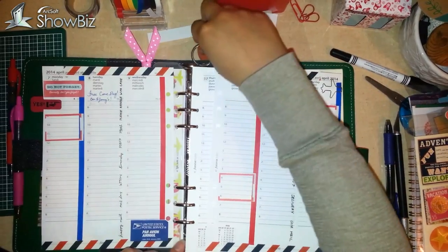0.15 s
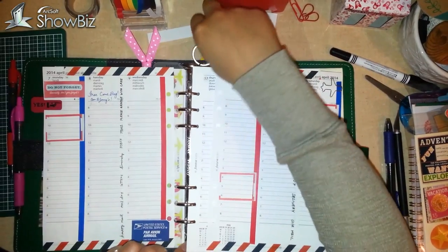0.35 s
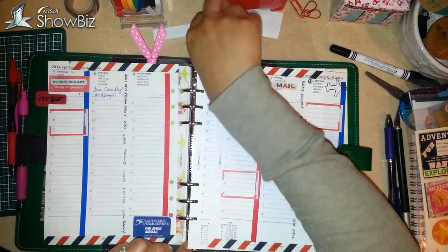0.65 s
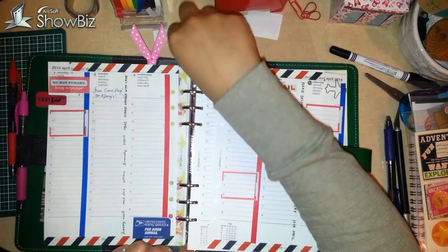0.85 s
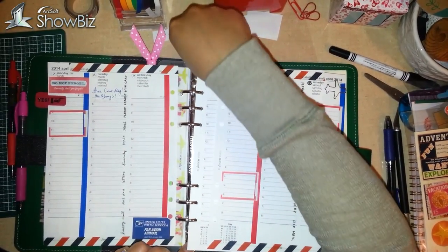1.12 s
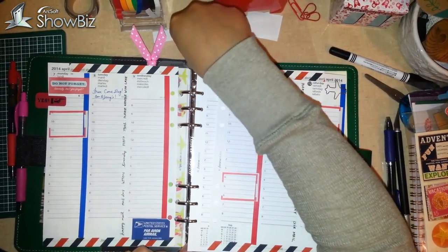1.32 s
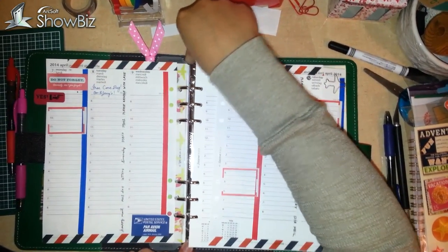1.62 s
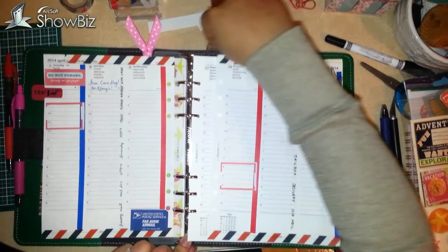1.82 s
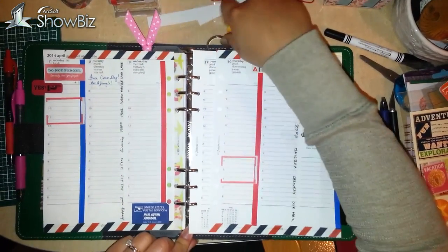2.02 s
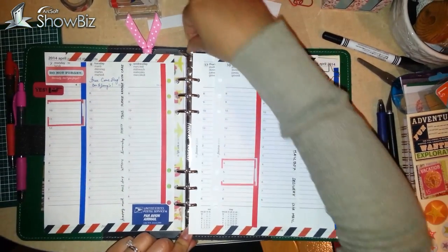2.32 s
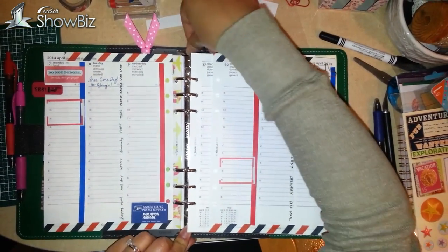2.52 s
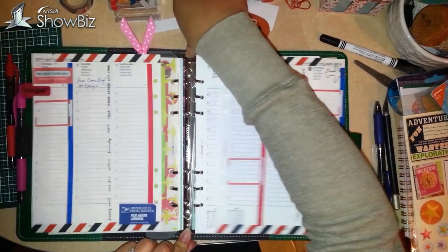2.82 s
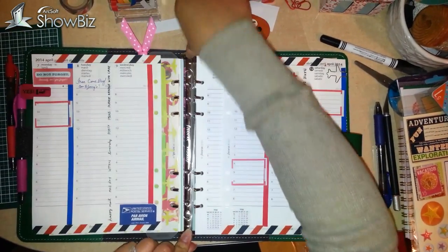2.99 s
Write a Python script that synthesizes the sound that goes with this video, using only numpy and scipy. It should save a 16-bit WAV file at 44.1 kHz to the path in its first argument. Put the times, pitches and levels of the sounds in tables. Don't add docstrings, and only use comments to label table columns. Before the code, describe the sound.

Close above a desk in a small room, binder rings click and knock in a quick flurry, quieten to faint paper sliding and tiny ticks, then close with a hard crack and brief shudder over faint background hum.

```python
import sys
import numpy as np
from scipy import signal
from scipy.fft import rfft, irfft, next_fast_len
from scipy.io import wavfile
from scipy.ndimage import uniform_filter1d, map_coordinates

SR = 44100
rng = np.random.default_rng(int(sys.argv[2]) if len(sys.argv) > 2 else 0)


def unload_audio(sound):
    columns = np.transpose(np.atleast_2d(sound))
    steps = np.round(np.clip(columns, -1, 1) * 32767)
    wavfile.write(sys.argv[1], SR, steps.astype(np.int16))


def linear_from_db(decibels):
    return 10 ** (np.asarray(decibels, float) / 20)


N = 138915


def unit(x):
    return x / np.sqrt(np.mean(x ** 2))


def high(x, hz):
    return signal.sosfilt(signal.butter(4, hz, "high", fs=SR, output="sos"), x)


def dull(x):
    return signal.sosfilt(signal.ellip(6, 1, 40, 14300, fs=SR, output="sos"), x)


def colour(x, points):
    length = x.shape[-1]
    size = next_fast_len(length)
    hz = np.fft.rfftfreq(size, 1 / SR) + 1
    point_hz, point_db = np.array(points).T
    gain = linear_from_db(np.interp(np.log(hz), np.log(point_hz), point_db))
    return irfft(rfft(x, size) * gain, size)[..., :length]


def burst(ms, noise):
    t = np.arange(len(noise)) / (max(ms, .1) * SR / 1000)
    return noise * np.exp(-t) * (1 - np.exp(-6 * t))


def pair(length):
    mid, side = rng.standard_normal((2, length))
    side = signal.lfilter(*signal.butter(2, 450, "high", fs=SR), side)
    return np.array([mid + side, mid - side])


def add(track, s, x, pan_db):
    i = max(int(s * SR), 0)
    x = x[..., :N - i]
    track[:, i:i + x.shape[-1]] += linear_from_db(np.array([[pan_db], [-pan_db]]) / 2) * x


MODE_JITTER, MODE_SCATTER_DB = .008, 2
SPREAD_DB, SPREAD_HZ = 5, 1900
TICK_FALL_DB_PER_OCT = 17.5


def ring(x, modes, near_hz=0):
    out = 0
    x = np.pad(x, ((0, SR // 4)))
    scatter = rng.standard_normal((len(modes), 3))
    for (hz, db, t60), (detune, louder, lean) in zip(modes, scatter):
        turn = 2j * np.pi * hz * (1 + MODE_JITTER * detune) / SR
        pole = np.exp(turn - np.log(1000) / (max(t60, .002) * SR))
        db = db + MODE_SCATTER_DB * louder
        if near_hz:
            db = db - TICK_FALL_DB_PER_OCT * abs(np.log2(hz / near_hz))
        lean_db = lean * SPREAD_DB * min(hz / SPREAD_HZ, 1) * np.array([[1], [-1]]) / 2
        out = out + linear_from_db(db + lean_db) * signal.lfilter([1], [1, -pole], x).imag
    return out


def fading(bands, width):
    t = np.arange(SR // 2 + SR // 4) / SR
    tail = 0
    for hz, db, t60 in bands:
        band_pass = signal.butter(1, [hz / width, hz * width], "band", fs=SR, output="sos")
        band = signal.sosfilt(band_pass, pair(len(t)))
        tail = tail + linear_from_db(db - 60 * t / t60) * unit(band)
    gap_s = 0.0042
    return tail * np.clip(t / gap_s - 1, 0, 1)


# start_s [s], level_db [dB], contact_ms [ms]
KNOCKS = [(.002, -30, 2.35), (0.101, -38.5, 1.74), (0.214, -41, 0.45), (0.535, -38.5, 1.4),
          (.590, -20.5, 1.03), (.594, -21, 0.93), (0.601, -20.5, 1.6), (0.62, -30, 1.4), (0.648, -44, 0.19),
          (0.7235, -28, 0.86), (.730, -18, 1.9), (.738, -26.5, 0.57), (.740, -15.5, 0.56),
          (0.772, -34, 0.62), (0.789, -31, 0.96), (.833, -29, 0.66), (1.134, -39, 1.54), (1.150, -42, 0.96),
          (1.705, -46, 1.4), (1.839, -42.5, 1.75), (2.01, -51.5, 0.44), (2.047, -35.5, 3.3),
          (2.055, -40.5, 5.3), (2.156, -53, 0.56), (2.477, -45, 0.35), (2.484, -33, 1.16),
          (2.826, -19.5, 0.61), (2.829, -9.5, 1.4), (3.053, -46, 0.57), (3.094, -40, 0.43)]
# pitch_hz [Hz], level_db [dB], t60_s [s]
DESK_MODES = [(151.6, -16, 0.59), (194, -5, 0.042), (276.6, -4, 0.08), (342, -0.5, 0.063),
              (455, -0.5, 0.059), (518, -4.5, 0.041), (601, -3.5, 0.049), (743.6, 0.5, 0.036),
              (887, -3, 0.032), (1123, 4.5, 0.023), (1378, -9.5, 0.075), (1500, -5, 0.071),
              (1800, -9, 0.089)]


def desk():
    x = np.zeros((2, N))
    t_ms = np.arange(400) / SR * 1000
    for s, db, ms in KNOCKS:
        push = np.sin(np.pi * np.clip(t_ms / max(ms, .1), 0, 1)) ** 2
        add(x, s, ring(linear_from_db(db) * push / push.sum(), DESK_MODES), 2)
    return high(x, 199.0) / 2


# start_s [s], level_db [dB], pitch_hz [Hz], t60_s [s]
THRUMS = [(.004, -44.5, 898, 0.092), (.008, -40, 269.8, 0.28), (.219, -42.5, 759, 0.11),
          (.597, -20, 289, 0.07), (.592, -29, 810, 0.09), (.618, -27, 282, 0.065),
          (0.737, -22.5, 282, 0.088), (.738, -30, 1120, .04), (.622, -23, 455, 0.076),
          (.650, -36, 645, 0.089), (0.654, -31, 459, 0.11), (0.758, -24.5, 277, 0.073),
          (.760, -44, 895, 0.13), (.774, -27.5, 276.7, 0.18), (0.789, -30.5, 459, 0.13),
          (.800, -46, 154.4, .3), (.838, -31, 455, 0.14), (2.828, -11, 304, 0.031), (2.825, -28, 1075, .03),
          (2.848, -23, 450, .12), (2.888, -35.5, 450, 0.14)]


def desk_thrum():
    x = np.zeros((2, N))
    t = np.arange(SR // 3) / SR
    k = SR // 100
    swell = 1 - np.exp(-t / 0.0057)
    for (s, db, hz, t60), noise in zip(THRUMS, rng.standard_normal((len(THRUMS), len(t)))):
        flutter_db = 2 * unit(uniform_filter1d(uniform_filter1d(noise, k), k))
        level = linear_from_db(db + flutter_db - 60 * t / t60)
        add(x, s, level * swell * np.sin(2 * np.pi * hz * t), 1.5)
    return x


# start_s [s], level_db [dB], length_ms [ms], strongest_hz [Hz]
TICKS = [(0.037, -43, 5.5, 2400), (0.1, -39.5, 9.4, 2000), (0.120, -31.5, 5, 1620), (.129, -39, 3, 2880),
         (.197, -45, 3, 4400), (.489, -46.5, 6, 2270), (0.215, -38, 4.7, 1800), (.498, -39, 13, 2250),
         (0.528, -36, 17, 2750), (0.588, -27.5, 27, 1570), (0.605, -34.5, 24, 2830),
         (0.725, -35.5, 11, 2180), (0.752, -26, 5.7, 2620), (.787, -26.5, 3.1, 2640),
         (0.795, -28, 5.5, 2670), (0.8173, -23, 2.1, 2700), (.832, -20, 4, 3150), (.856, -26.5, 4.2, 2460),
         (0.872, -35, 11, 2700), (.882, -41, 5, 2500), (0.919, -40, 2.4, 2400), (.8435, -15.5, 9.3, 3070),
         (.900, -34.5, 1.9, 2350), (1.128, -45.5, 30, 2300), (1.881, -46, 3.8, 2400),
         (1.458, -45, 5.2, 2460), (1.704, -48, 5.5, 3070), (1.791, -46.5, 8.9, 2900),
         (1.805, -48, 7.8, 2400), (1.821, -39.5, 1.2, 2530), (1.838, -42, 1.7, 2400),
         (1.858, -34, 3.4, 3200), (1.866, -37, 2.6, 2620), (1.889, -45, 3, 2300), (1.902, -45, 2.7, 2600),
         (1.914, -46, 2.2, 3420), (1.925, -57, 2, 2470), (1.935, -61, 1.8, 2500), (1.971, -48, 3.4, 3500),
         (2.024, -53, 3, 1700), (2.838, -18, 6, 2280), (2.9085, -34, 3.6, 1920), (1.845, -34, 1.7, 2820),
         (1.8504, -35, 3.9, 2900), (1.958, -40.5, 8, 1850), (2.01, -36.5, 5, 1730), (2.101, -49, 4, 2100),
         (2.158, -49.5, 6.2, 2180), (3.079, -48, 2.2, 2570), (3.092, -40.5, 8.3, 3000),
         (3.11, -39.5, 4.3, 3400)]
# pitch_hz [Hz], level_db [dB], t60_s [s]
METAL_MODES = [(1140, 6, 0.0057), (1670, -9, 0.025), (2244, 0.5, 0.017), (2550, -0.5, 0.008),
               (2920, -9, 0.0066), (4060, 0.5, 0.013), (4610, -8.5, 0.024), (5070, -43, 0.0027),
               (8000, 1.5, 0.015), (9900, -17, 0.0016)]


def metal():
    x = np.zeros((2, N))
    for (s, db, ms, hz), noise in zip(TICKS, rng.standard_normal((len(TICKS), 2000))):
        rattle = linear_from_db(db) * burst(ms / 2, noise) / np.sqrt(ms * 10)
        add(x, s, ring(rattle, METAL_MODES, hz), 5.5)
    return high(x, 1180)


# start_s [s], level_db [dB], decay_ms [ms], pan_db [dB]
CRACKS = [(.738, -37.5, 1.85, -30), (0.787, -29, 1.9, 4), (0.7924, -30.5, 4.3, -4), (0.8166, -32, 3.2, -9),
          (0.898, -45, 3.2, -8), (1.843, -37, 5.3, 1), (2.011, -46.5, 3.1, 4), (2.156, -48, 4.3, -3),
          (2.483, -40, 4.9, -1), (2.82, -27.5, 3.1, 0), (2.825, -14, 4.56, -2)]
# pitch_hz [Hz], level_db [dB per Hz]
CRACK_COLOUR = [(350, -10.5), (600, 6), (1830, -1.5), (2900, -2), (4770, -8), (7060, -17), (10400, -14),
                (15000, -25)]
# pitch_hz [Hz], level_db [dB], t60_s [s]
RING_MODES = [(800, -21, 0.011), (1360, 14, 0.0077), (2320, -9, 0.02), (2900, -3.5, 0.02),
              (4170, 0.5, 0.021)]
# pitch_hz [Hz], level_db [dB], t60_s [s]
SHUDDER = [(264, -30, 0.15), (448, -21.5, 0.15), (840, -33.5, 0.35), (1380, -40.5, 0.44), (2400, -31, 0.13),
           (3900, -37.5, 0.32), (7500, -59, 0.22), (12000, -49, 0.36)]
SNAP_S, SNAP_DB = 2.8255, -21


def snap():
    x = np.zeros((2, N))
    for (s, db, ms, pan), (mid, side) in zip(CRACKS, rng.standard_normal((len(CRACKS), 2, 1500))):
        ports = [unit(colour(mid + k * .5 * side, CRACK_COLOUR)) for k in (1, -1)]
        add(x, s, linear_from_db(db) * np.array([burst(ms, noise) for noise in ports]), pan)
    blow = linear_from_db(SNAP_DB) * burst(2.3, rng.standard_normal(800)) / 10
    add(x, SNAP_S, high(ring(blow, RING_MODES), 440), 1.5)
    add(x, SNAP_S, dull(high(fading(SHUDDER, 1.106), 210)), 1)
    return x


# start_s [s], length_s [s], level_db [dB], pan_db [dB]
SCRAPES = [
    (0, 0.23, -64, -16),
    (0.74, 0.038, -47, -2),
    (0.779, 0.045, -42.5, 1),
    (0.819, 0.11, -42, -1),
    (1.459, 0.079, -54, -0.5),
    (1.792, .19, -52.5, -1.5),
    (2.786, 0.03, -59, 2),
    (3.077, 0.074, -50, -2),
]
# pitch_hz [Hz], level_db [dB per Hz]
PAPER_COLOUR = [(800, 1), (1600, -6), (2300, -5.5), (3300, -6), (4500, -7), (5900, -15.5), (8500, -14.5),
                (14500, -17)]
# start_s [s], level_db [dB]
SHUFFLE = [(0, -48.5), (.25, -65), (0.399, -61.5), (1, -59), (1.6, -69), (1.95, -58), (2.2, -63.5),
           (2.35, -91), (2.5, -60), (2.7, -72), (3.15, -59)]
GRAINS_PER_S, GRAIN_SCATTER_DB = 6600, 2
SCRAPE_ATTACK = 0.17


def paper():
    chance, size = rng.random(N), rng.exponential(size=N)
    grain_level = (chance < GRAINS_PER_S / SR) * linear_from_db(GRAIN_SCATTER_DB * np.minimum(size, 3.5))
    grains = grain_level * (pair(N) + rng.standard_normal(N))
    grains = unit(colour(grains, PAPER_COLOUR))
    x = grains[:, ::-1] * linear_from_db(np.interp(np.arange(N) / SR, *np.array(SHUFFLE).T))
    for s, length, db, pan in SCRAPES:
        i = max(int(s * SR), 0)
        t = np.arange(int(length * SR)) / (length * SR)
        g = grains[:, i:i + len(t)]
        shape = np.minimum(t / SCRAPE_ATTACK, (1 - t) / (1 - SCRAPE_ATTACK))[:g.shape[1]]
        add(x, s, linear_from_db(db) * g * shape ** 0.35, pan)
    return x


# pitch_hz [Hz], level_db [dB], t60_s [s]
ROOM_BANDS = [(123.5, -4.5, 0.38), (257, -44, 0.067), (500, -9, 0.28), (926, -3, 0.32), (2000, -2.5, 0.35),
              (4130, -8.5, 0.15), (8640, -4, 0.64), (13000, -20, .2)]


def room(x):
    tail = fading(ROOM_BANDS, np.sqrt(2)) / 150
    return signal.fftconvolve(x.mean(0, keepdims=True), tail, axes=1)[:, :N]


# pitch_hz [Hz], level_db [dB per Hz]
HUM_COLOUR = [(15, -59), (25, -18), (87, -2.5), (198, -5.5), (267, -9.5), (413, -15), (810, -22),
              (900, -30), (1170, -29), (1980, -120)]
# pitch_hz [Hz], level_db [dB per Hz]
HISS_COLOUR = [(410, 1), (700, -4.5), (828, -7), (895, -1.5), (1950, -2.5), (2590, -5), (5640, -13),
               (14000, -9.5), (15500, -46)]
HUM_DB, HISS_DB, WAVER_DB = -55.5, -63, 1


def floor():
    k = SR // 8
    waver = unit(uniform_filter1d(uniform_filter1d(rng.standard_normal(N), k), k))
    hum = colour(pair(N) + 1.28 * rng.standard_normal((2, N)), HUM_COLOUR + [(1400, -40.0)])
    hiss = colour(rng.standard_normal((2, N)), [(450, -40)] + HISS_COLOUR)
    return linear_from_db(HUM_DB + WAVER_DB * waver) * unit(hum) + linear_from_db(HISS_DB) * unit(hiss)


def scene():
    near = desk() + desk_thrum() + dull(metal()) + snap() + dull(high(paper(), 260))
    left_late_s = .00002
    late = map_coordinates(near[0], [np.arange(N) - left_late_s * SR], mode="nearest")
    return np.array([late, near[1]]) + dull(high(room(near), 86)) + floor()


def low_pass(x):
    return signal.sosfilt(signal.butter(12, 15670, fs=SR, output="sos"), x)


def record(dry):
    x = signal.sosfilt(signal.butter(1, 60, "high", fs=SR, output="sos"), dry)
    x = signal.sosfilt(signal.ellip(6, 1, 60, 15500, fs=SR, output="sos"), x)
    duck_s, duck_length_s, duck_db = 2.8165, 0.0032, -7.5
    dip = np.exp(-((np.arange(N) / SR - duck_s) / duck_length_s) ** 2)
    return low_pass(x * linear_from_db(duck_db * dip))


dry = scene()
out = record(dry)
unload_audio(out)
```